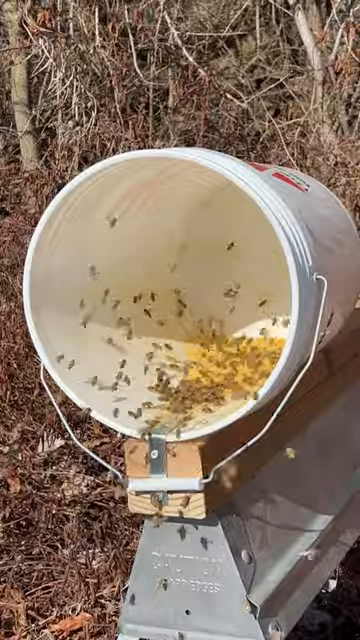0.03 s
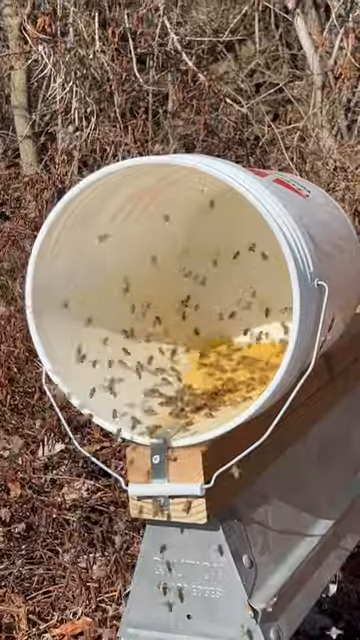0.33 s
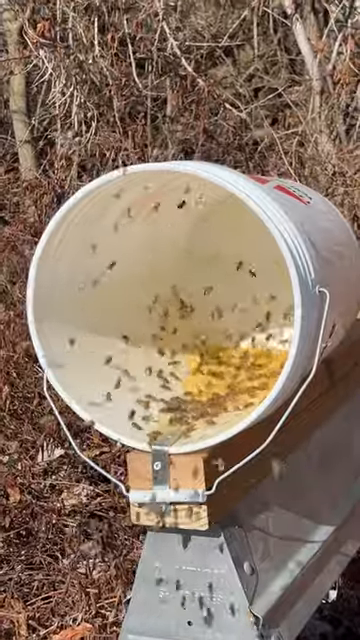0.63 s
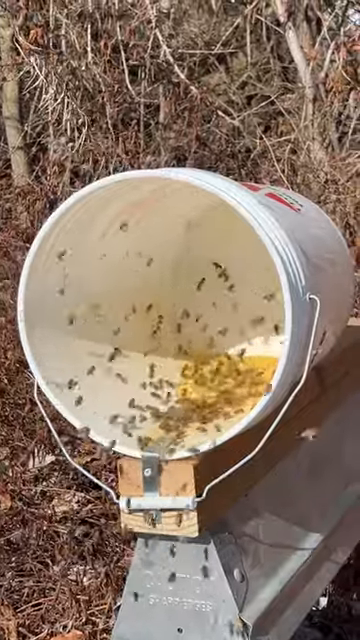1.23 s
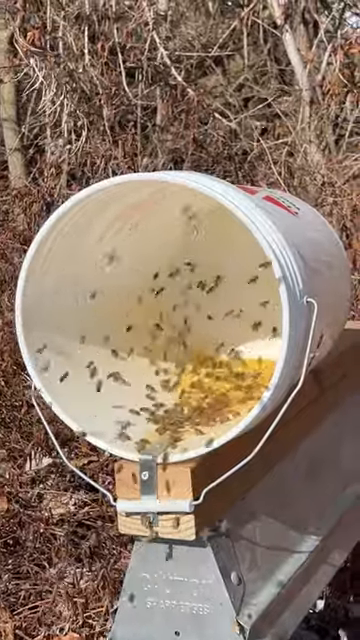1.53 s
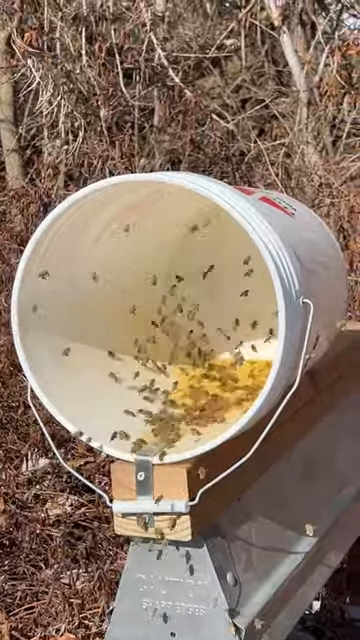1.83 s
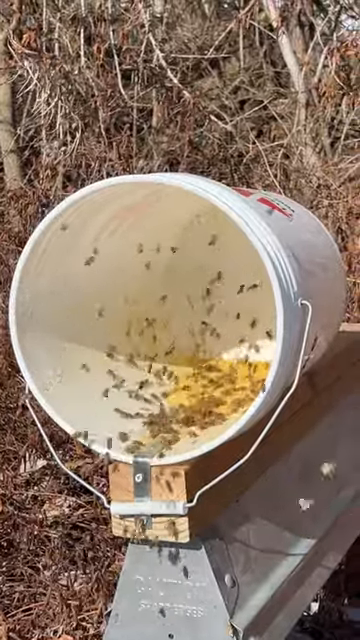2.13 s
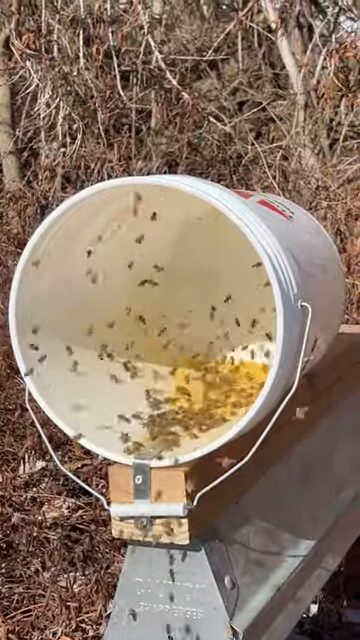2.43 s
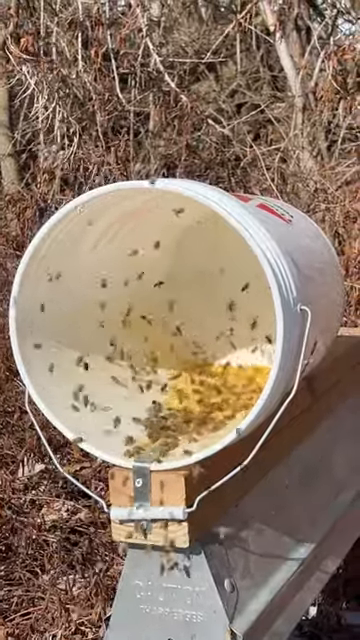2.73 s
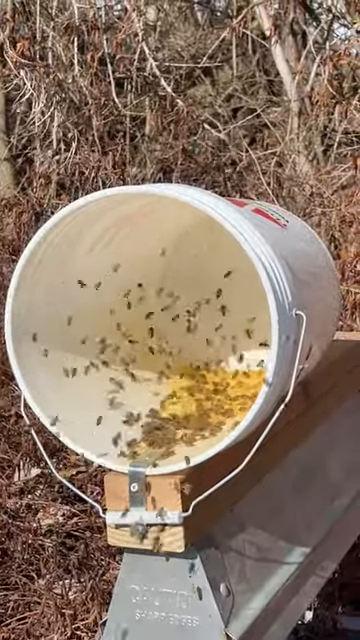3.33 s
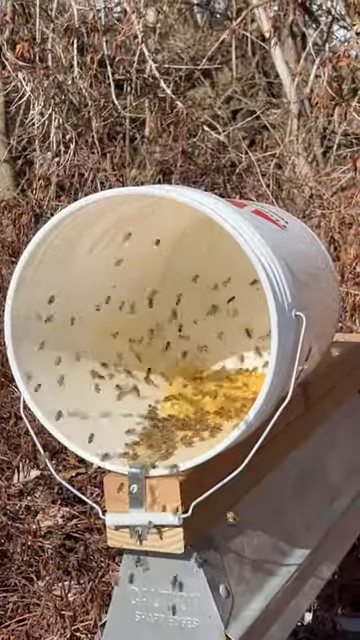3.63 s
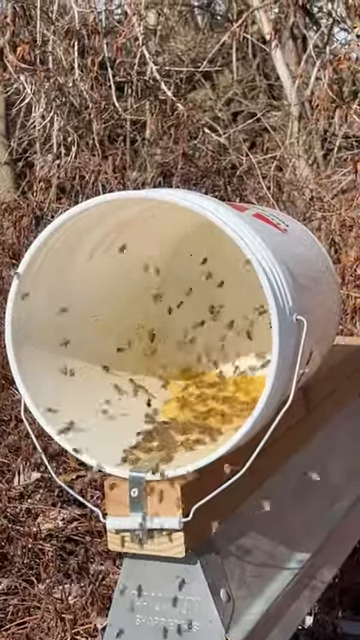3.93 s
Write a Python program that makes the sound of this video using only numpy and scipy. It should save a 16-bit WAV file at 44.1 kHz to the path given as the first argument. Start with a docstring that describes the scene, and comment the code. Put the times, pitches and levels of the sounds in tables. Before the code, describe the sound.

Many honeybees buzz around an open bucket feeder outdoors, about a metre away, for the whole four seconds. Their dense, slightly raspy hum wavers as single bees come and go, swelling briefly around 0.4, 1.6, 3.1 and 3.8 seconds. Underneath, a light breeze rumbles on the microphone in small gusts, with a faint, low distant drone and a soft airy hiss throughout.

```python
"""Honeybees swarm in and around an open bucket feeder outdoors, about a metre away.
Dozens of wingbeats near 250 Hz wander, swell and beat against each other, a few bees close by.
Each stroke is a sharp flick, scattered by the bucket, and a puff of torn air that adds a faint rasp.
Underneath, a light breeze rumbles on the microphone over a faint far drone and an airy hiss."""
import sys
import numpy as np
from scipy import signal
from scipy.fft import rfft, irfft
from scipy.io import wavfile
from scipy.ndimage import map_coordinates

SR = 44100
rng = np.random.default_rng(int(sys.argv[2]) if len(sys.argv) > 2 else 0)


def unload_audio(sound):
    """Save the sound as a 16-bit wav file, at the path given as the first command line argument."""
    columns = np.transpose(np.atleast_2d(sound))
    # keep every value between -1 and 1, then stretch to whole-number steps
    steps = np.round(np.clip(columns, -1, 1) * 32767)
    wavfile.write(sys.argv[1], SR, steps.astype(np.int16))


N = 176400


def undb(db):
    return 10 ** (np.asarray(db) / 20)


def level(x, db):
    """Sets the rms level."""
    return x * undb(db) / np.sqrt(np.mean(x ** 2))


def panned(db):
    """Channel gains that put the left db above the right."""
    return undb(np.array([[1], [-1]]) * db / 2)


def envelope(points):
    """Gain over time from (t/s, level/dB) points."""
    when, db = np.array(points, float).T
    return undb(np.interp(np.arange(N) / SR, when, db))


def curve_at(points, hz):
    """Reads (f/Hz, value) points on a log-frequency axis."""
    freqs, values = np.array(points, float).T
    return np.interp(np.log(np.maximum(hz, 1)), np.log(freqs), values)


def drift(per_s):
    """Smooth random modulator with a spread of about 1."""
    knots = rng.standard_normal(1024)
    grid = np.arange(0, N + 64, 64)
    place = rng.random() + grid * per_s / SR
    coarse = map_coordinates(knots, [place + 2], mode="wrap")
    return np.interp(np.arange(N), grid, coarse)


def stereo_noise(eq, correlation):
    """Noise of a given spectrum and left-right correlation, rms 1."""
    hz = np.fft.rfftfreq(N, 1 / SR)
    mid, side = rfft(rng.standard_normal((2, N)))
    alike = np.clip(curve_at(correlation, hz), -1, 1)
    both = mid * np.sqrt(1 + alike) + np.array([[1], [-1]]) * side * np.sqrt(1 - alike)
    return level(irfft(both * undb(curve_at(eq, hz)), N), 0)


# Tone colour of the hiss: f/Hz, relative level/dB
HISS_EQ = [(100, 16), (360, 5), (1000, 3.5), (3000, -14.5), (4800, 0), (5800, -0.5), (7700, 3.5),
           (9800, 0.7), (11100, 2.5), (12200, -0.5), (13500, -5.5), (14700, 3), (16000, -14.5)]
# Stereo width of the hiss and rasp, centred from 1.8 to 4.9 kHz, wide above: f/Hz, L-R correlation
HISS_IMAGE = [(100, .3), (1300, 0.68), (1800, 1), (4900, 1), (5400, 0.28), (9000, 0.14), (14000, 0.051)]
# Gentle level ride of the hiss: t/s, relative level/dB
HISS_RIDE = [(0, 0.5), (.25, 1), (.62, -0.4), (1.0, 1.5), (1.18, 2.7), (1.45, -.3), (1.9, 0.5), (2.03, 2),
             (2.15, 0.5), (2.83, 0.2), (3.5, -.1), (3.65, 1.5), (4, 1)]


def outdoor_hiss():
    """A nearly steady bed of outdoor hiss."""
    return level(stereo_noise(HISS_EQ, HISS_IMAGE) * envelope(HISS_RIDE), db=-55)


# Level ride of the far drone: t/s, relative level/dB
DRONE_RIDE = [(0, 1), (.3, 6.5), (.65, 3), (1.1, -4), (1.3, -0.5), (1.8, -8), (2.27, 4), (2.65, -1),
              (2.85, 4), (3.1, -7), (3.3, 3.5), (3.8, -10.5)]


def far_drone(hz=97.96):
    """A faint low tone that wavers, swells and recedes."""
    pitch = hz * (1 + .011 * drift(per_s=3))
    tone = np.sin(2 * np.pi * np.cumsum(pitch) / SR)
    return level(tone * envelope(DRONE_RIDE), db=-51)


# Tone colour of the wind rumble: f/Hz, relative level/dB
RUMBLE_EQ = [(12, -45), (22, -19), (32, -11), (48, -2.5), (70, 1), (98, -5), (125, -12), (170, -22),
             (220, -13), (330, -30.5), (600, -82)]
# Stereo width of the rumble: f/Hz, L-R correlation
RUMBLE_IMAGE = [(30, 1), (70, 0.82), (130, 0.4), (250, 0.51)]
# Gust envelope: t/s, level/dB
GUSTS = [(0.05, -40), (0.06, -40), (0.74, -46), (0.8, -41.5), (0.84, -44), (0.89, -39), (0.93, -49),
         (0.97, -36.5), (1.01, -52.5), (1.46, -38.5), (1.52, -51), (1.57, -40), (2.06, -48), (2.11, -36.5),
         (2.16, -48), (2.19, -40.5), (2.23, -45.5), (3.21, -46), (3.28, -35.5), (3.35, -44.5), (3.44, -38),
         (3.46, -43), (3.76, -39.5), (3.87, -47), (3.9, -36.5), (4.0, -37.5)]


def breeze():
    """Gusts buffet the microphone with a low rumble."""
    return stereo_noise(RUMBLE_EQ, RUMBLE_IMAGE) * envelope(GUSTS) * panned(db=-.9)


# Tone colour of the wing rasp: f/Hz, relative level/dB
RASP_EQ = [(300, -19), (700, 18.5), (1500, 0.5), (2700, -21.5), (4000, -24), (8000, 0.5), (15000, -5)]


def wing_rasp(puff_power):
    """Air torn by the wings: noise that pulses with the strokes."""
    return level(np.sqrt(puff_power) * stereo_noise(RASP_EQ, HISS_IMAGE), db=-69)


# Accents in the wingbeat hum, each at its crest: t/s, f/Hz, level/dB
HUM_ACCENTS = [(.07, 254, -45.5), (.39, 244.3, -42), (.65, 248.7, -47), (.92, 242, -50), (1.42, 249.4, -47),
               (1.61, 243, -44), (2.03, 242, -48), (2.49, 248, -46), (2.971, 250.5, -46),
               (3.11, 246.4, -43), (3.59, 243, -45.5), (3.79, 245, -41.5)]


def hum_swells(width_s=.042, sag_hz_per_s=29):
    """The lowest tone of the buzz swells for a moment and sags in pitch."""
    hum = 0
    for when, hz, db in HUM_ACCENTS:
        t = np.arange(N) / SR - when
        phase = rng.random() + hz * t - sag_hz_per_s * t ** 2 / 2
        bell = np.exp(-(t / width_s) ** 2 / 2)
        hum = hum + undb(db) * np.sqrt(2) * bell * np.sin(2 * np.pi * phase)
    return hum * panned(db=-2.5)


# Harmonic colour of the wings in the bucket: f/Hz, relative level/dB
WING_EQ = [(200, 4), (250, -1), (300, -3), (460, -3.5), (530, -1), (620, -2.5), (760, -9), (1020, -8.5),
           (1290, -9.5), (1560, -11.5), (1780, -9.5), (2050, -15.5), (2650, -15), (3200, -20.5),
           (4000, -26), (5500, -30.5), (8000, -33.5), (12000, -35.5)]


def wing_stroke(hz, size, colour_db=2.5, twist_rad=.98, bucket_share=.46):
    """One stereo wingbeat cycle: a sharp flick plus the bucket's scatter."""
    harmonics_hz = np.arange(47) * hz
    colour, twist, real, imag = rng.standard_normal((4, len(harmonics_hz)))
    flick = undb(colour_db * colour) * np.exp(1j * twist_rad * twist)
    width = 1 / (1 + (harmonics_hz / 1590) ** 20)  # only the low harmonics spread out
    pan_db = -5 * np.tanh(harmonics_hz / 560) + 3 * rng.standard_normal()  # leans right
    scatter = np.array([[1], [-1]]) * width * bucket_share * (real + 1j * imag) / np.sqrt(2)
    eq = undb(curve_at(WING_EQ, harmonics_hz)) * (harmonics_hz > 0)
    return irfft(panned(width * pan_db) * (flick + scatter) * eq, size)


def bee(hz, swell_db, size=8192):
    """One bee's buzz, changing colour as it turns, and the power of the air puffed at each stroke."""
    steering = .032 * drift(per_s=6)
    flutter = .012 * drift(per_s=40)
    pitch = hz * (1 + steering + flutter)
    phase = (rng.random() + np.cumsum(pitch) / SR) % 1
    index = (phase * size).astype(int) % size
    facing = .5 + .5 * np.tanh(drift(per_s=7))
    toward = wing_stroke(hz, size).take(index, axis=1)
    away = wing_stroke(hz, size).take(index, axis=1)
    buzz = facing * toward + (1 - facing) * away
    nearness_db = swell_db * 2 * np.tanh(drift(per_s=4.964) / 2)  # the bee comes and goes
    nearness = level(undb(nearness_db), 0)
    puff = nearness * (1 - phase) ** 2
    return level(buzz, 0) * nearness, puff ** 2


def swarm(hz, detune, swell_db, db, count):
    """Bees beating against each other, detuned over a bell curve by a fraction of hz."""
    rank = (np.arange(count) + .5) / count
    offsets = np.log(rank / (1 - rank)) * np.sqrt(3) / np.pi
    buzz, puffs = 0, 0
    for offset in offsets:
        tone, puff = bee(hz * (1 + detune * offset), swell_db)
        buzz, puffs = buzz + tone, puffs + puff
    return level(buzz, db), puffs / puffs.mean()


def honeybees():
    """The crowd at the feeder, some slow hoverers, a few close fliers, and the rasp of wings."""
    crowd, crowd_puffs = swarm(hz=255.5, detune=.04, swell_db=3, db=-43.5, count=40)
    hoverers, _ = swarm(hz=221.9, detune=.06, swell_db=4, db=-57, count=6)
    close, close_puffs = swarm(hz=254.5, detune=.04, swell_db=4.5, db=-53, count=4)
    return crowd + hoverers + close + wing_rasp(crowd_puffs + close_puffs)


def scene():
    """Bees in front; breeze, drone and hiss behind."""
    return honeybees() + hum_swells() + breeze() + far_drone() + outdoor_hiss()


def record(dry):
    """A 2 ms fade-in after an instant of silence, then a steep high cut."""
    start_s, top_hz = .036, 15750
    fade_in = np.clip((np.arange(N) / SR - start_s) / .002, 0, 1)
    high_cut = signal.ellip(12, .1, 70, top_hz, fs=SR, output="sos")
    return signal.sosfilt(high_cut, dry * fade_in)


dry = scene()
out = record(dry)
unload_audio(out)
```